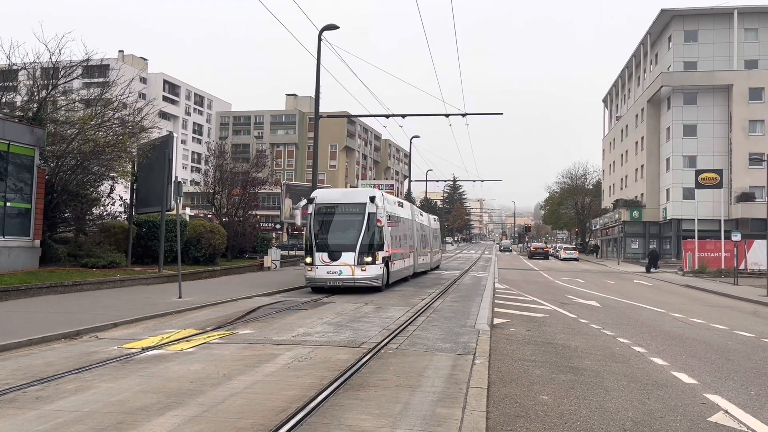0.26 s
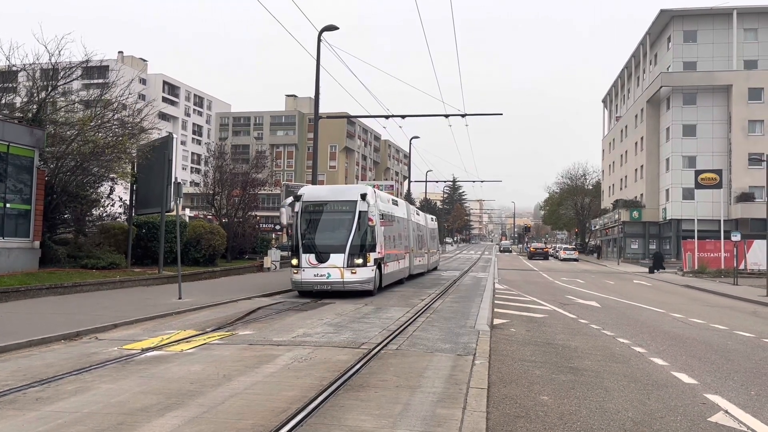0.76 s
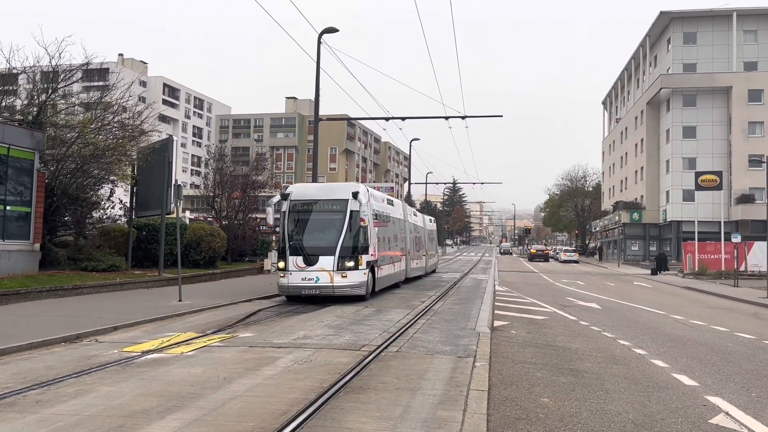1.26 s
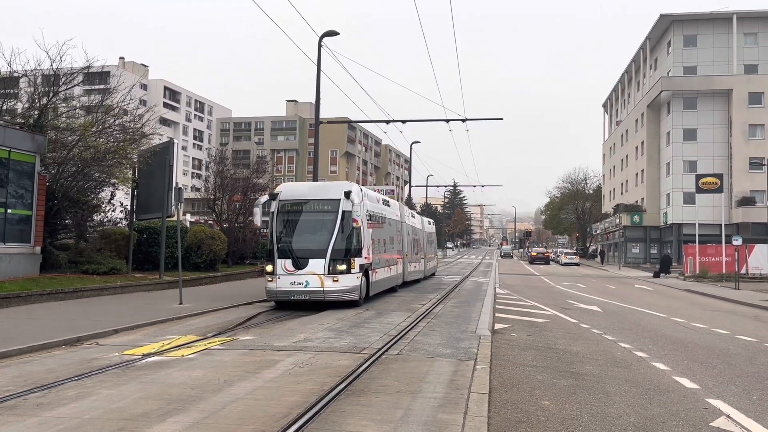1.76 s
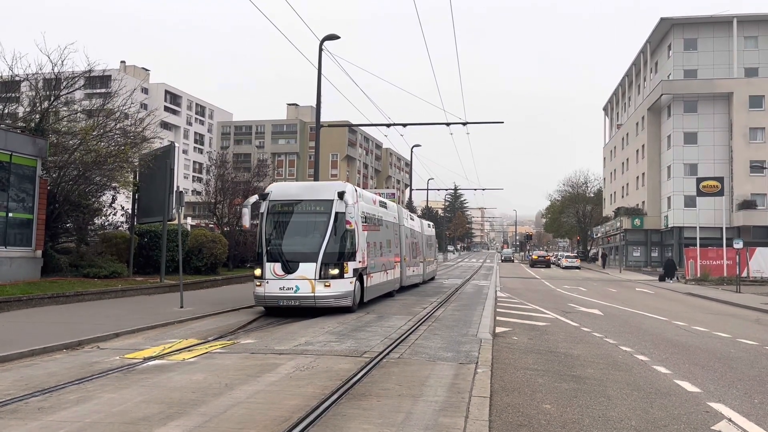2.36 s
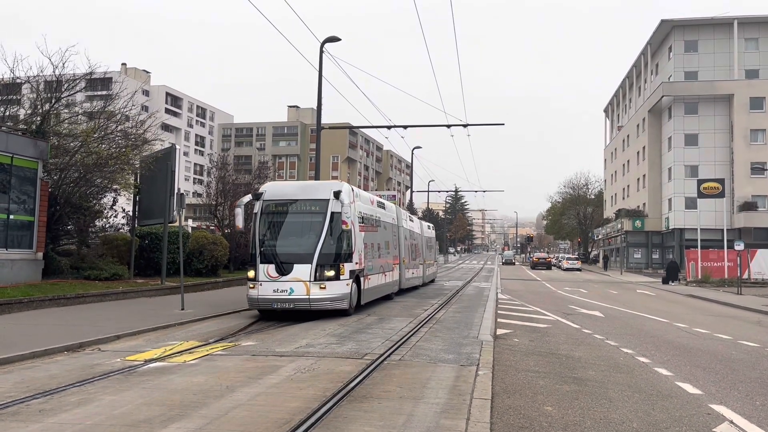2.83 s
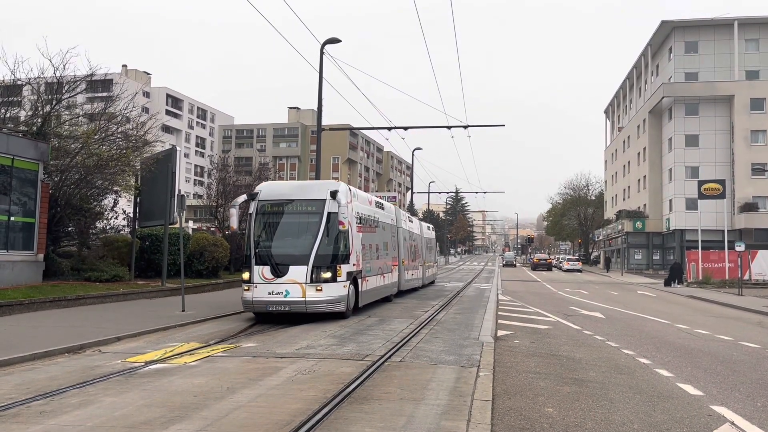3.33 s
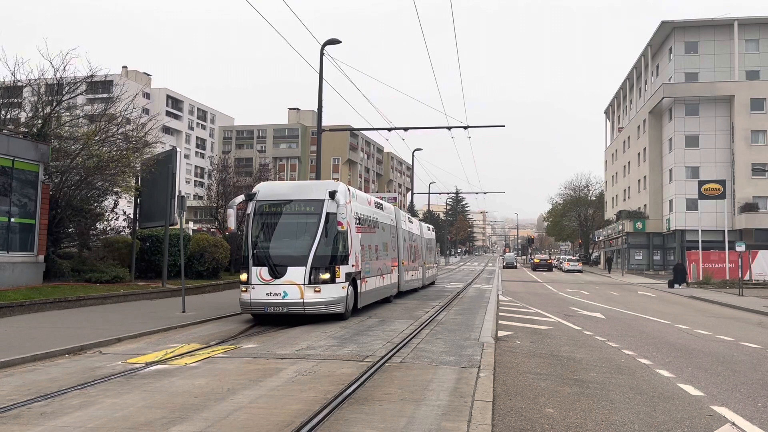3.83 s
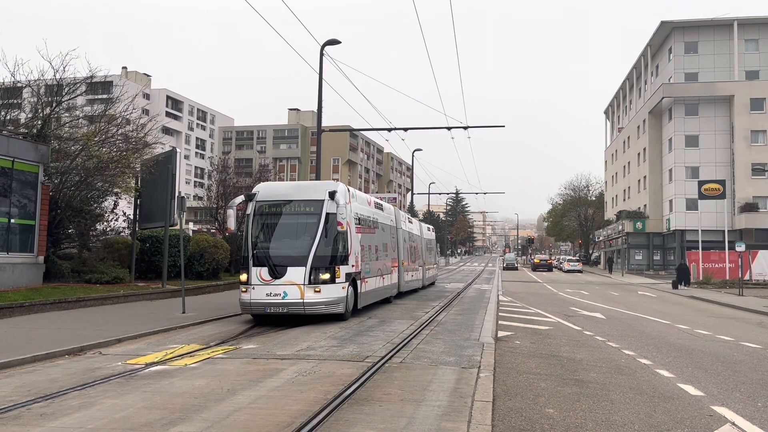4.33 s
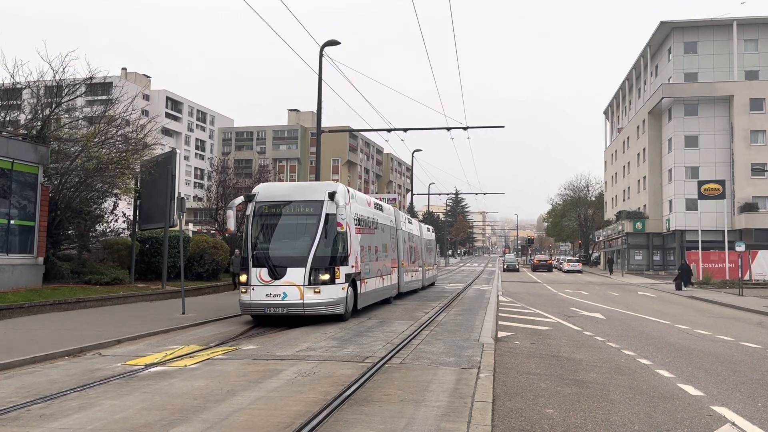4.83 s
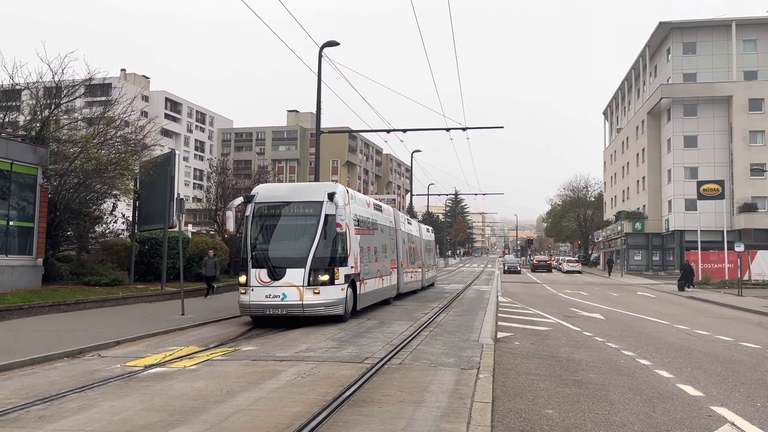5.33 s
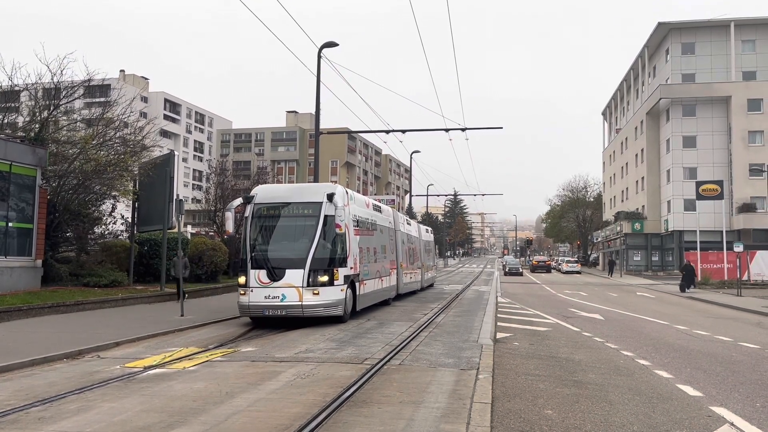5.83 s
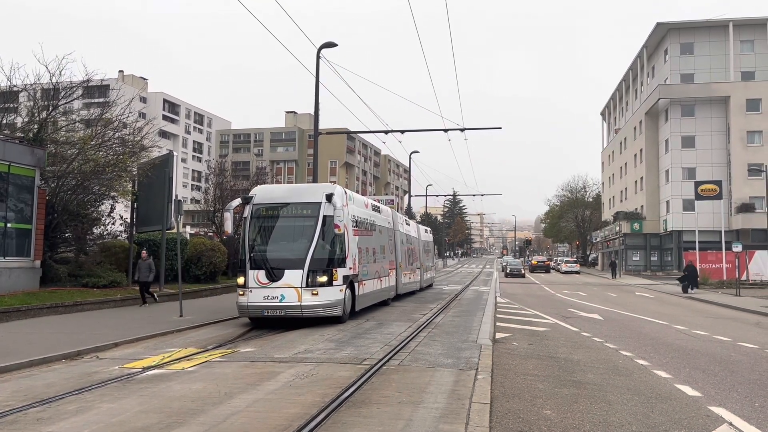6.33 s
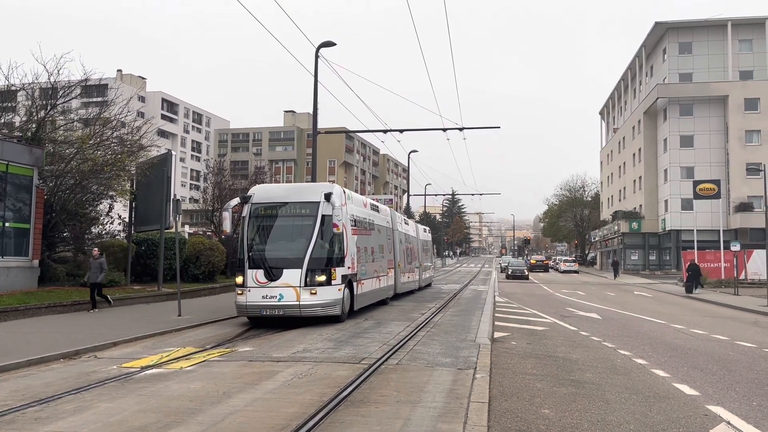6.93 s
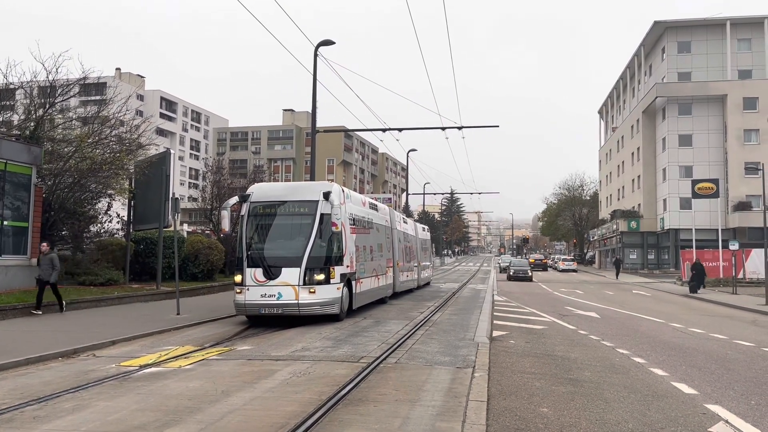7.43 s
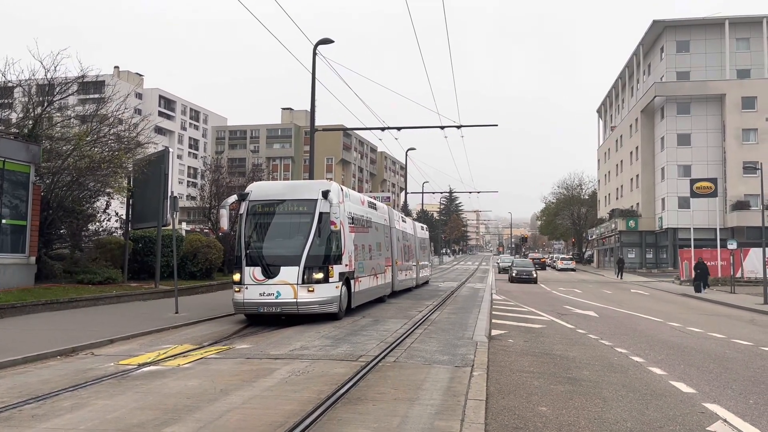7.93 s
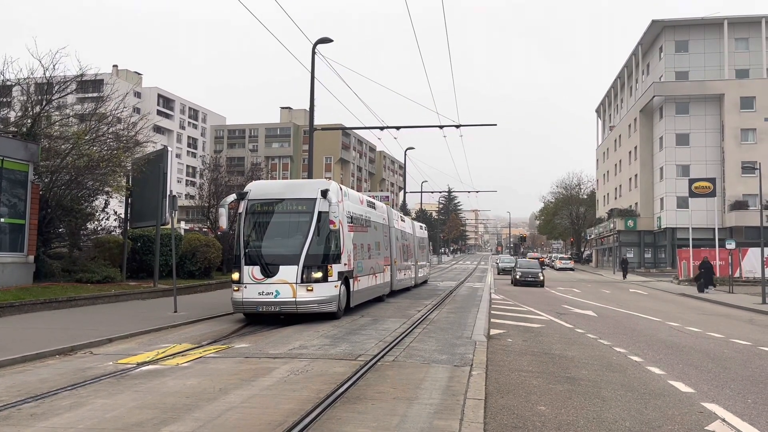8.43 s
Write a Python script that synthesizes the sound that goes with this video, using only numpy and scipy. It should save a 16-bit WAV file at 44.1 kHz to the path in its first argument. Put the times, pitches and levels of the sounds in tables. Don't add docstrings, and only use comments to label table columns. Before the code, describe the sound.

Outdoors by a city road, a phone-like microphone catches wind buffets and distant traffic. A nearby electric tram slows, its buzzy whine dropping in steps over tyre hiss and gear hum. Two thin brake squeals beat together around three seconds, small metal ticks follow, then compressed air bursts out. A car rolls past, a door drive whirs, and two heavy plates slam and bounce near the end.

```python
import sys
import numpy as np
from scipy import signal
from scipy.fft import rfft, irfft
from scipy.io import wavfile
from scipy.ndimage import uniform_filter1d

SR = 44100
rng = np.random.default_rng(int(sys.argv[2]) if len(sys.argv) > 2 else 0)


def dump(signal):
    limited = np.clip(np.atleast_2d(signal).T, -1, 1)
    pcm = np.round(limited * 32767).astype(np.int16)
    wavfile.write(sys.argv[1], SR, pcm)


def how_loud(loudness_db):
    steps = np.asarray(loudness_db, float) / 20
    return 10 ** steps


N = 382562
HZ = np.fft.rfftfreq(N, 1 / SR)
T = np.arange(N) / SR

# t/s, rumble level/dB, flutter over rumble/dB
GUSTS = [(0, -31, 2), (.9, -42, 7.5), (1.25, -36.5, 5), (1.6, -37.5, 2.5), (2.3, -36, 3), (3.4, -33, 2),
         (4.2, -30, -5.5), (5.6, -28.5, -5), (6.98, -29.5, 0.5), (7.08, -59, 13), (7.75, -31, -6),
         (8.67, -28, -4)]
# t/s, rumble level/dB, half length/s
BUFFETS = [(.05, -16.5, 0.02), (.62, -32, 0.16), (1.98, -29.5, 0.18), (2.42, -22.5, 0.051),
           (2.77, -21.5, 0.06), (2.93, -25, 0.074), (3.28, -24, 0.043), (4.83, -25, 0.19),
           (5.22, -29, 0.055), (5.4, -26.5, 0.1), (5.79, -22.5, 0.024), (5.89, -22, .045),
           (6.16, -25.5, 0.06), (6.56, -19, 0.031), (6.68, -24, 0.059), (6.9, -24.5, 0.027)]
BUFFET_FLUTTER_DB = -24.5
# t/s, peak level/dB, f/Hz
THUMPS = [(1.889, -14.5, 158.3), (2.397, -18, 78.6), (2.722, -15.5, 89.6), (2.779, -15, 62),
          (2.829, -15, 101), (2.94, -20, 60.5), (3.194, -13.5, 106), (3.289, -30, 62), (4.774, -11, 79.5),
          (5.353, -12, 67), (5.755, -32, 81.5), (5.871, -13, 62.5), (6.559, -7.5, 87), (6.758, -25, 91.5),
          (6.831, -8.5, 112), (6.888, -22, 61.6), (6.933, -8.5, 114), (6.999, -13.5, 151)]
# t/s, peak level/dB, f/Hz
SLAPS = [(4.72, -24, 280), (4.8, -22, 160), (4.838, -19, 70), (5.01, -20, 150), (5.282, -18, 132),
         (5.347, -15.5, 267), (6.33, -21.5, 200), (6.83, -27, 300), (6.936, -22, 300)]
# t/s, peak level/dB, f/Hz
THUDS = [(8.022, -17, 85), (8.05, -22, 90), (8.105, -18, 95), (8.14, -26, 90), (8.238, -13, 120),
         (8.27, -12, 105), (8.29, -18, 100)]

# t/s, level/dB, treble tilt/dB per octave
ROAD = [(0.0, -44.5, 2), (1.35, -44, -1), (2.3, -45.5, 2), (3.24, -43.5, 4), (6.28, -42.5, 2.5),
        (8.67, -39, 2.5)]
# f/Hz, level/dB
TOWN = [(30, -11.5), (60, 14), (150, 4), (300, 1), (600, -0.5), (1000, -1), (1600, -8), (1900, -10),
        (2300, -18.5), (3300, -23), (5000, -34), (7500, -42.5), (11000, -46), (15000, -53)]
# f/Hz, likeness/0-1
LIKENESS = [(60, 0.97), (130, 0.9), (290, 0.88), (630, 0.4), (1370, 0.65), (3000, 1), (6000, 0.6),
            (7500, 0.88), (15000, 0.3)]
# f/Hz, level/dB
HUM = [(51, -35.5), (250, -54), (297, -49.5), (619, -47.5), (1236, -57)]

# t/s, level/dB
TONE = [(0.0, -40.5), (0.35, -34), (0.66, -35.5), (0.79, -48.5), (1.5, -49), (1.62, -58.5), (2.1, -53.5),
        (2.4, -61)]
# t/s, level/dB, half length/s
SURGES = [(.71, -27, 0.031), (.96, -36, 0.011), (1.69, -40, 0.019), (1.82, -39.5, 0.035), (2.02, -51, .04)]
# f/Hz, width/Hz, level over the rest/dB
CASE_RING = [(1069, 21, 14.5), (1141, 40, 6.5)]
# multiple, level/dB, sideband index/rad
WHOLE_ORDERS = [(2, 3, .9), (3, 4, 1.5), (4, -4, 1.9), (5, -9.5, .9), (6, -12, .9), (7, -15.5, .9),
                (8, -17, .9)]
# multiple, level/dB, sideband index/rad
HALF_ORDERS = [(3.5, -5, .1), (4.5, -24.5, .1)]
# level/dB, loudest t/s, fall away from it/(dB/s), gone t/s
ORDER_GROUPS = [
    (-40.5, 1.25, 7.5, 2.1),
    (-41, 2.3, 0.5, 2.344),
    (-42.5, 1.7, 7.5, 2.95),
    (-41.5, 1.95, 3.5, 3.04),
]
# f/Hz, width/Hz, level/dB
CASE = [(1857, 12, -2.5), (2002, 31, -6), (2350, 104, -4.5), (2580, 88, -10.5), (2965, 56, -8.5),
        (3202, 130, -3.5), (3557, 88, 4.5), (4000, 120, -29), (5163, 110, -0.5), (5566, 56, -0.5),
        (5780, 61, -1), (5420, 75, 2.5), (4310, 110, -6.5)]
STEP_S, FIRST_STEP_S, START_HZ, DROP_HZ, FLOOR_HZ = .2375, .0135, 1157, 38.5, 803
MOTOR_HZ, MOTOR_SAG_HZ, CRAWL_HZ = 27.34, 2.25, 6.6
LOCK_S, LOCK_PULL_HZ = .675, 8
LOOSE_THROB_HZ, THROB_PEAK_S = 24.75, .099
LOOSE_SIDEBANDS, LOCKED_SIDEBANDS, LOOSE_BLUR_HZ, LOCKED_BLUR = 4.3, 0.55, 258.4, 1
RING_ON_S = .752
SETTLE_S = 0.041

# t/s, level/dB
ROLL = [(0, -56), (.7, -51), (1.4, -50), (2.1, -53.5), (3, -53), (4.1, -81.5)]
# f/Hz, level/dB
TREAD = [(300, -11.5), (500, 10.5), (1200, -19), (2400, -6), (4400, -12.5), (6000, -13.5), (7500, -25.5),
         (12000, -29.5)]
STREET_T60_S, STREET_DB = 1, -12
# t/s, f/Hz, level/dB, octave level/dB
GEAR = [(.55, 158.4, -57, -57), (.75, 145.5, -54, -41.5), (1.05, 128.2, -52, -40.5), (1.15, 125, -60, -58)]
# t/s, f/Hz, level/dB, octave level/dB
AXLE = [(1.0, 151.5, -43, -67), (1.3, 134.6, -36, -81), (1.6, 123.7, -35.5, -78), (1.9, 114.5, -38, -74),
        (2.3, 105, -65, -72)]
# t/s, peak level/dB, f/Hz
TICKS = [(.72, -58, 7000), (1.86, -60.5, 10900), (3.64, -46.5, 5800), (3.64, -35, 1700), (3.671, -36, 1500),
         (3.64, -64, 11100), (4.02, -56.5, 12000), (4.08, -64, 11900), (4.19, -45.5, 4500),
         (4.258, -46, 3000), (6.0, -58, 11900), (6.36, -57, 8950), (7.0, -75, 11000), (7.11, -60, 2000),
         (7.615, -51, 4000), (4.92, -49.5, 9000), (5.47, -60, 11000), (5.766, -46.5, 2500)]

# start t/s, end t/s, start f/Hz, end f/Hz, level/dB
DISC = [(2.3, 2.52, 7580, 7720, -69), (2.78, 2.98, 8950, 9150, -66), (2.9, 3.1, 10800, 10950, -64),
        (3.08, 3.52, 9420, 9330, -64), (3.3, 3.75, 10580, 10620, -68), (3.48, 3.85, 9780, 9950, -66),
        (2.95, 3.2, 12300, 12400, -70), (3.3, 3.85, 13100, 13300, -68), (3.72, 4.0, 8700, 8900, -65),
        (3.33, 3.63, 8610, 8620, -52), (7.68, 7.89, 4950, 4950, -54), (4.45, 4.75, 4310, 4320, -70)]
# t/s, f/Hz, level/dB
PAD_A = [(2.872, 4304, -61), (2.9, 4320, -39), (2.93, 4332, -28), (3.1, 4354, -36.5), (3.144, 4350, -51),
         (3.17, 4360, -36.5), (3.228, 4363, -27), (3.276, 4366, -24.5), (3.4, 4358, -46), (3.6, 4300, -70)]
# t/s, f/Hz
PAD_B_PITCH = [(2.9, 4330), (3.21, 4270), (3.38, 4292), (4.12, 4316)]
# t/s, level/dB, half length/s
PAD_B_SWELLS = [(2.99, -40, 0.049), (3.07, -36, .05), (3.14, -44, .02), (3.22, -38.5, .04),
                (3.35, -36, 0.038), (3.42, -37, 0.056), (3.54, -42.5, .03), (3.65, -38, 0.057),
                (3.75, -38, 0.058), (3.85, -49, 0.031), (3.96, -45.5, 0.054), (4.09, -62, .02)]
# multiple, level/dB
PAD_ORDERS = [(2, -32), (3, -43)]
# t/s, level/dB, half length/s
PAD_HISS = [
    (3.1, -68, .15),
    (3.5, -69, .25),
]
PAD_HISS_HZ, PAD_HISS_WIDTH_HZ = 12800, 700
STARVE_DB, STARVE_LOW_HZ, STARVE_HIGH_HZ = -33, 4620, 6100

# opens t/s, level/dB, opening time/s, shuts t/s, low roar level/dB
PUFFS = [
    (4.265, -62, 0.086, 4.56, -3),
    (4.918, -46.5, 0.034, 5.27, 0),
    (7.1, -69.5, .38, 7.6, -8.5),
]
OPENING_DB, SAG_DB_S, TREBLE_SAG_DB_S, SHUT_DB_S = 9, 18, 17, 60
# f/Hz, level/dB
JET = [(700, -15), (2000, -0.5), (3500, -2.5), (6000, -8), (8500, -1.5), (11500, -3.5), (14500, -4.5),
       (16000, -17)]
# f/Hz, level/dB
LEAK = [(700, -34.5), (2000, 1.5), (3500, 0.5), (6000, -4), (8500, -5), (11500, -5.5), (14500, -5),
        (16000, -22.5)]
# f/Hz, width/Hz, level/dB
PIPE = [(2350, 160, 8), (3000, 180, 6.5), (5000, 300, 7.3), (5700, 100, 7.1), (6500, 250, 7),
        (11400, 300, 5.5), (12200, 180, 5.5)]
# t/s, level/dB
DOOR_AIR = [(7.612, -53.5), (7.75, -55.5), (7.93, -51), (8.25, -49), (8.67, -55)]

# t/s, level/dB, half length/s
WHISTLE = [
    (7.45, -68.5, .2),
    (6.05, -73, .12),
]
WHISTLE_HZ, WHISTLE_WIDTH_HZ = 12300, 1200
# t/s, level/dB, half length/s
CAR = [
    (6.3, -51.5, 0.41),
    (6.85, -47.5, 0.44),
]
CAR_HZ, CAR_WIDTH_HZ = 1035, 260
# t/s, level/dB, half length/s
DRIVE = [
    (7.8, -51.5, .12),
    (7.93, -48.5, .05),
]
DRIVE_HZ, DRIVE_WIDTH_HZ = 620, 600
# t/s, peak level/dB, f/Hz
LATCH = [
    (7.93, -38, 800),
    (7.92, -31.5, 1840),
    (8.12, -24.5, 1840),
]

# t/s, level/dB, contact/s
SLAM_A = [(8.02, -16, 0.0061), (8.028, -0.5, 0.0072), (8.037, -5.5, 0.0026), (8.048, -7.5, 0.008),
          (8.058, -11, 0.012), (8.068, -13.5, 0.012), (8.085, -17, 0.011), (8.122, -16.5, 0.0038)]
# t/s, level/dB, contact/s
SLAM_B = [(8.212, -16.5, 0.0068), (8.22, -3, 0.011), (8.228, -2.5, 0.0052), (8.236, -10, 0.006),
          (8.248, -7.5, 0.012), (8.262, -15, 0.013), (8.278, -18, 0.0029), (8.312, -24.5, 0.011)]
# f/Hz, width/Hz, level/dB
PLATE_A = [(191, 60, -2), (283, 48, 3.5), (398, 36, 1), (512, 40, -1), (694, 140, -7), (840, 40, 2),
           (1020, 190, -11.5), (1333, 64, -5.5), (1800, 90, -10), (2550, 140, -9.5), (3180, 190, -13.5),
           (4520, 220, -17), (6100, 730, -26), (11870, 460, -22.5)]
# f/Hz, width/Hz, level/dB
PLATE_B = [(124, 22, -1), (330, 37, -1.5), (455, 41, -0.5), (520, 57, -2.5), (640, 96, -6), (891, 46, 5),
           (1080, 70, -4), (1410, 60, -4), (1900, 110, -10.5), (2740, 280, -11), (3550, 770, -22.5),
           (5290, 120, -17), (6300, 290, -35.5), (11700, 800, -34)]
# f/Hz, level/dB
CRASH = [(80, -33), (250, -6.5), (900, 4.5), (1900, 1), (3300, -11.5), (6000, -18.5), (11500, -22.5),
         (16000, -51.5)]

# f/Hz, left lead/rad
PORTS = [(0, 0), (1100, 0.2652), (1500, -2), (1900, 0.5), (3400, 1.17), (5200, 0.75), (6700, 1.07),
         (7700, -2.5), (8900, -3), (10000, -5.5), (11000, -5), (13000, -9), (14600, -8.5)]


def shape(table):
    hz, value = np.transpose(table)
    return np.interp(np.log(HZ + 1), np.log(hz + 1), value)


def colour(x, gain):
    return irfft(rfft(x) * gain, N)


def unit(x):
    return x / np.std(x)


def coloured_noise(gain):
    return unit(colour(rng.standard_normal(N), gain))


def resonance(hz, width_hz):
    return 1 / (1 + 1j * (HZ ** 2 - hz ** 2) / (width_hz * HZ + 1e-9))


def curves(table):
    s, *columns = np.transpose(table)
    gate = uniform_filter1d(1. * ((T >= s[0]) & (T < s[-1])), size=200)
    return [np.interp(T, s, c) for c in columns] + [gate]


def swells(table):
    return sum(how_loud(db) * np.exp(-((T - s) / half_s) ** 2) for s, db, half_s in table)


def phase_of(hz):
    return 2 * np.pi * np.cumsum(hz) / SR + rng.uniform(0, 2 * np.pi)


def walk(rate_hz):
    k = int(SR / rate_hz)
    held = np.repeat(rng.standard_normal(N // k + 1), k)
    return 1.278 * uniform_filter1d(uniform_filter1d(held, k), k)[:N]


def pan(x, db):
    return x * how_loud(np.array([[db / 2], [-db / 2]]))


def add(out, s, burst):
    i = int(s * SR)
    out[i:i + len(burst)] += burst[:N - i]


def wind():
    db, flutter_db, _ = curves(GUSTS)
    opposite = np.array([[1], [-1]])
    low = coloured_noise(resonance(56.8, 36) * resonance(55.3, 65))
    flutter_gain = resonance(122, 78) * resonance(190, 310)
    mid, side = coloured_noise(flutter_gain), coloured_noise(flutter_gain)
    thumps, t = np.zeros(N), T[:4000]
    for s, peak_db, hz in THUMPS + THUDS + SLAPS:
        cycle = np.sin(2 * np.pi * hz * t) + 0.34 * np.sin(4.6 * np.pi * hz * t)
        add(thumps, s + 0.00746, how_loud(peak_db - 4.0) * cycle * np.exp(-((t * hz - .7) / .5) ** 2))
    buffets = swells(BUFFETS)
    rumble = low * np.hypot(how_loud(db), buffets) * how_loud(-1.0 + 1.0 * walk(8.3))
    flutter = (how_loud(db + flutter_db) + how_loud(BUFFET_FLUTTER_DB) * buffets) * how_loud(-5.0 + 3.35 * walk(28))
    apart = 1 + 0.17 * walk(40) * opposite
    return apart * (rumble + thumps) + flutter * (mid + 0.22 * side * opposite)


def traffic():
    db, treble_db, _ = curves(ROAD)
    like = np.clip(shape(LIKENESS), 0, 1)
    town = how_loud(shape(TOWN))
    mid, side = (rfft(rng.standard_normal(N)) * town * np.sqrt(1 + sign * like) for sign in (1, -1))
    out, swell = 0, walk(2.1)
    for octave in np.arange(4.5, 14.6, .5):
        band = np.clip(1 - abs(np.log2(HZ + 1) - octave) / .5, 0, 1)
        gain = how_loud(treble_db * np.clip(octave - 10, 0, 2.5) + 0.16 * swell + 0.75 * walk(9))
        out = out + gain * (irfft(mid * band, N) + irfft(side * band, N) * np.array([[1], [-1]]))
    return out * how_loud(db + 12.5)


def hum():
    return sum(how_loud(db + 2.77 * walk(14)) * np.sin(phase_of(hz * (1 + 0.00596 * walk(15)))) for hz, db in HUM)


def inverter():
    step, loose = np.floor((T - FIRST_STEP_S) / STEP_S).clip(0), T < LOCK_S
    pulled = ~loose & (step == LOCK_S // STEP_S)
    hz = np.maximum(START_HZ - DROP_HZ * step, FLOOR_HZ) - LOCK_PULL_HZ * pulled
    motor_hz = np.where(loose, LOOSE_THROB_HZ, np.maximum(MOTOR_HZ - MOTOR_SAG_HZ * step, CRAWL_HZ))
    motor = 2 * np.pi * (np.cumsum(motor_hz) / SR - LOOSE_THROB_HZ * THROB_PEAK_S)

    ring_hz = START_HZ - 2 * DROP_HZ - LOCK_PULL_HZ
    lowest = phase_of(np.where(~loose & (T < RING_ON_S), ring_hz, hz))
    spread = np.where(loose, LOOSE_SIDEBANDS, LOCKED_SIDEBANDS)
    tone, power = 0, 0
    for j in range(-5, 4):
        ring = 1
        for f, w, g in CASE_RING:
            ring = ring + how_loud(g) / np.sqrt(1 + (2 * (hz + j * motor_hz - f) / w) ** 2)
        weight = ring ** 2 * np.exp(-(j / spread) ** 2) * how_loud(2.2 * walk(7.3))
        tone = tone + weight * np.sin(lowest + j * motor + 0.87 * walk(8.8))
        power = power + weight ** 2 / 2
    tone_db, gate = curves(TONE)
    tone = tone / np.sqrt(power) * (gate * how_loud(tone_db + 1.5) + swells(SURGES))

    order_db = [db - fall_db_s * abs(T - s) - 110 * (T - gone_s).clip(0, .5)
                for db, s, fall_db_s, gone_s in ORDER_GROUPS]
    switch = phase_of(hz)
    locked_blur_hz = LOCKED_BLUR * (motor_hz - CRAWL_HZ / 2)
    blur_hz = np.where(loose, LOOSE_BLUR_HZ / (1 + 0.402 * step), locked_blur_hz)
    rebuild = np.clip((T - FIRST_STEP_S - step * STEP_S) / SETTLE_S, 0, 1) ** 2
    upper = 0
    for k, db, index in WHOLE_ORDERS + HALF_ORDERS:
        pair = 1
        if k % 1:
            pair = np.cos(motor + k) * how_loud(1.0 * np.minimum(motor_hz - 17, 0) - 5.0 * step * loose)
        group = int(k > 2) + int(k > 3.7) + int(k > 4.6)
        level = how_loud(db + order_db[group] + 2.3 * walk(30))
        level = level * np.where(loose | (k > 3) | (step > 9), 1, rebuild)
        depth = index * np.minimum(motor_hz / (11 if k == 4 else 19), 1) ** 2
        sidebands = depth * np.sin(2 * motor + k) + 0.71 * (k > 5) * (step < 8) * np.sin(6 * motor)
        upper = upper + level * pair * np.sin(k * switch + phase_of(blur_hz * walk(900)) + sidebands)
    case = sum(how_loud(g) * resonance(f, w) for f, w, g in CASE)
    return tone + colour(upper * (T < 3.2), case)


def tyres():
    db, gate = curves(ROLL)
    return gate * how_loud(db + 1.2 * walk(15)) * coloured_noise(how_loud(shape(TREAD)))


def street(x):
    t = T[:SR]
    tail = rng.standard_normal((2, SR)) * np.exp(-np.log(1000) * t / STREET_T60_S) * (t > .012)
    tail = tail / np.sqrt(np.sum(tail ** 2, axis=1, keepdims=True))
    echoes = signal.fftconvolve(x[None], tail, axes=1)[:, :N]
    return colour(echoes, how_loud(STREET_DB) / (1 + (HZ / 4000) ** 2))


def gears():
    out = 0
    for table in (GEAR, AXLE):
        hz, db, octave_db, gate = curves(table)
        out = out + gate * (how_loud(db) * np.sin(phase_of(hz)) + how_loud(octave_db) * np.sin(phase_of(2 * hz)))
    return out


def ticks(table, width, decay_s):
    out, t = np.zeros(N), T[:3000]
    for s, db, hz in table:
        band_hz = [hz * (1 - width), min(hz * (1 + width), 19000)]
        sos = signal.butter(1, band_hz, "band", fs=SR, output="sos")
        click = signal.sosfilt(sos, rng.standard_normal(len(t)) * np.exp(-t / decay_s))
        add(out, s, how_loud(db) * click / np.sqrt(width))
    return out


def brakes():
    out = np.zeros(N)
    a_hz, a_db, gate = curves(PAD_A)
    b_hz = curves(PAD_B_PITCH)[0]
    for hz, level in ((a_hz, gate * how_loud(a_db)), (b_hz, swells(PAD_B_SWELLS))):
        phase = phase_of(hz + 2.0 * walk(29.4))
        overtones = sum(how_loud(g + 3.7 * walk(21)) * np.sin(k * phase) for k, g in PAD_ORDERS)
        out += level * how_loud(2.5 + 1.9 * walk(40)) * (np.sin(phase) + overtones)
    for t0, t1, hz0, hz1, db in DISC:
        u = np.clip((T - t0) / (t1 - t0), 0, 1)
        level = np.sqrt(np.sin(np.pi * u).clip(0)) * how_loud(db + 2.5 + 5.0 * walk(24.12))
        out += level * np.sin(phase_of(hz0 + (hz1 - hz0) * u + 45 * walk(150) + 25 * walk(13)))
    return out


def starve(x):
    squeal = colour(x.mean(axis=0), resonance(4340, 200))
    squeal_rms = np.sqrt(uniform_filter1d(squeal ** 2, size=1000))
    loud = uniform_filter1d(1. * (squeal_rms > how_loud(STARVE_DB)) * (T < 5), size=400)
    return x - loud * colour(x, (HZ > STARVE_LOW_HZ) & (HZ < STARVE_HIGH_HZ))


def rolling(table, hz, width_hz):
    return swells(table) * how_loud(2.5 * walk(18)) * coloured_noise(resonance(hz, width_hz) ** 2)


def jet(gain_db):
    return coloured_noise(how_loud(gain_db)) * how_loud(0.97 * walk(25))


def valves():
    pipes = 1 + sum((how_loud(db) - 1) * abs(resonance(hz, w)) ** 2 for hz, w, db in PIPE)
    leak_db = shape(LEAK)
    gains_db = (leak_db, shape(JET) + 20 * np.log10(pipes), leak_db)
    out = 0
    for puff, gain_db, trim_db in zip(PUFFS, gains_db, (3.9, 6.3, 3.4)):
        s, db, open_s, shut_s, roar_db = puff
        course_db = OPENING_DB * np.minimum((T - s) / open_s - 1, 0)
        course_db = course_db - SAG_DB_S * (T - s - open_s).clip(0) - SHUT_DB_S * (T - shut_s).clip(0)
        air = jet(gain_db + roar_db * (HZ < 8000))
        treble_loss = how_loud(-TREBLE_SAG_DB_S * (T - s - 4 * open_s).clip(0)) - 1
        air = air + colour(air, HZ > 8000) * treble_loss
        out = out + (T > s) * how_loud(db + trim_db + course_db) * air
    db, gate = curves(DOOR_AIR)
    return out + gate * how_loud(db + 6.0) * jet(leak_db)


def slam(blows, plate, crash_db, top_db):
    t, grit, bright = T[:SR // 4], np.zeros(N), np.zeros(N)
    main_s = blows[1][0]
    for s, db, contact_s in blows:
        envelope = (1 - np.exp(-t / 0.00033)) * np.exp(-t / contact_s)
        touch = how_loud(db) * rng.standard_normal(len(t)) * envelope
        add(grit, s, touch)
        add(bright, s, touch * np.exp(-max(s - main_s, 0) / 0.05))
    rings = sum((-1) ** k * how_loud(db) * resonance(hz, w) for k, (hz, w, db) in enumerate(plate))
    body = 4.3 * rings + how_loud(shape(CRASH) + crash_db + top_db * (HZ > 7000))
    dull = 1 / (1 + (HZ / 2300) ** 4)
    return colour(grit, body * dull) + colour(bright, body * (1 - dull))


def scene():
    motor = inverter() + tyres() + gears()
    pads = brakes()
    air = valves() + ticks(TICKS, 0.32, 0.0067) + ticks(LATCH, .07, 0.015)
    plates = slam(SLAM_A, PLATE_A, -1.1, top_db=1.0) + slam(SLAM_B, PLATE_B, -1.5, top_db=-6.0)
    tram = pan(motor, 1.5) + pan(pads, 5.9) + pan(air, .3) + pan(plates, 0.22) + hum()
    echoes = street(2.2 * motor + 1.2 * pads + air + plates)
    bands = rolling(PAD_HISS, PAD_HISS_HZ, PAD_HISS_WIDTH_HZ) + rolling(WHISTLE, WHISTLE_HZ, WHISTLE_WIDTH_HZ)
    bands = bands + rolling(CAR, CAR_HZ, CAR_WIDTH_HZ) + rolling(DRIVE, DRIVE_HZ, DRIVE_WIDTH_HZ)
    return wind() + traffic() + tram + echoes + bands


def band_limit(x):
    return signal.sosfilt(signal.butter(12, 14600, fs=SR, output="sos"), x)


def record(dry):
    bass_cut = 1 / np.sqrt(1 + (42 / (HZ + 1)) ** 6)
    lead = shape(PORTS) / 2
    response = irfft(bass_cut * np.exp(1j * np.array([lead, -lead])), N)
    ports = np.roll(response, SR // 10, axis=1)[:, :SR // 5 + 1]
    mix = starve(signal.fftconvolve(dry, ports, "same", axes=1))
    return band_limit(mix)


dry = scene()
out = record(dry)
dump(out)
```